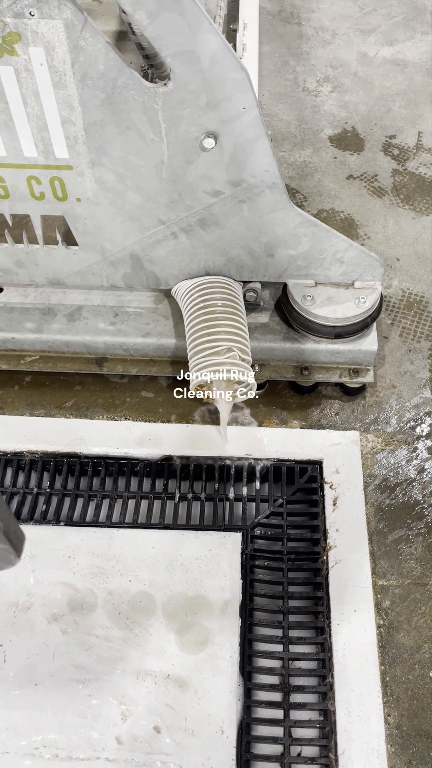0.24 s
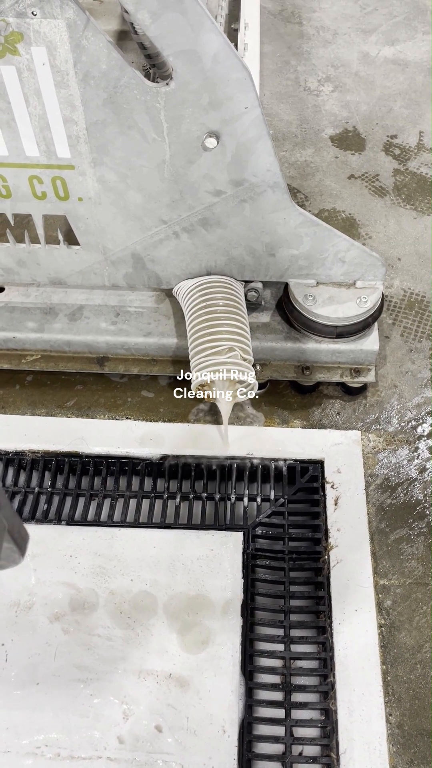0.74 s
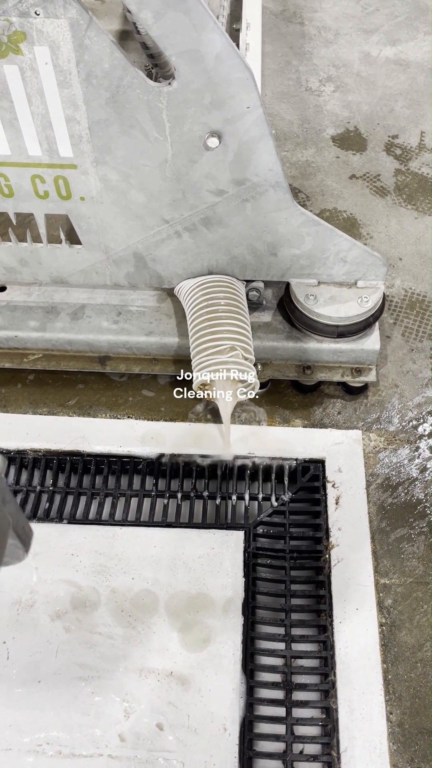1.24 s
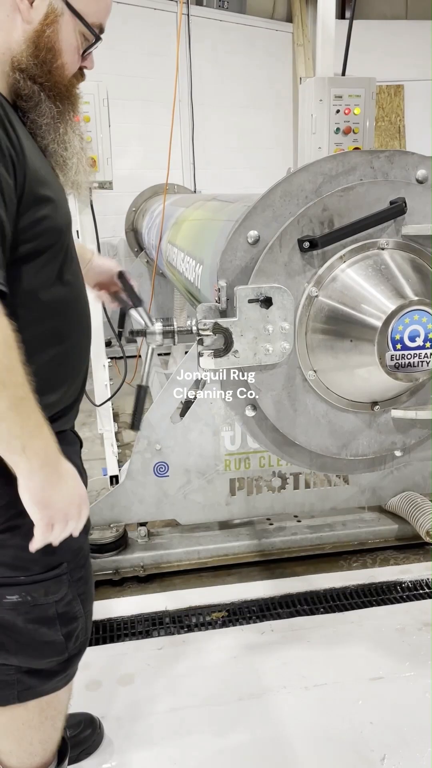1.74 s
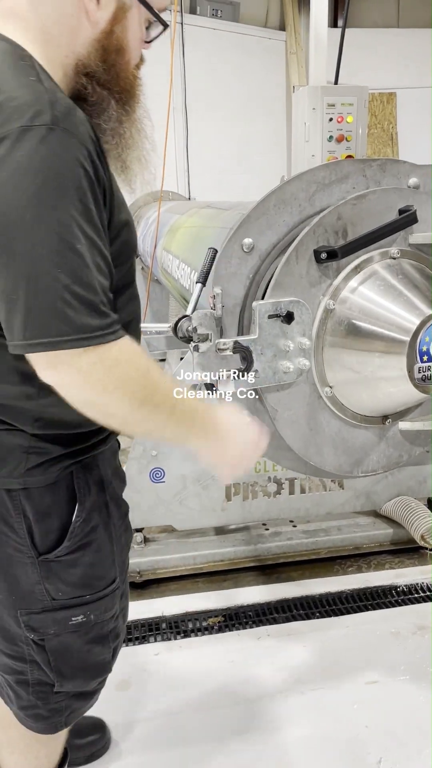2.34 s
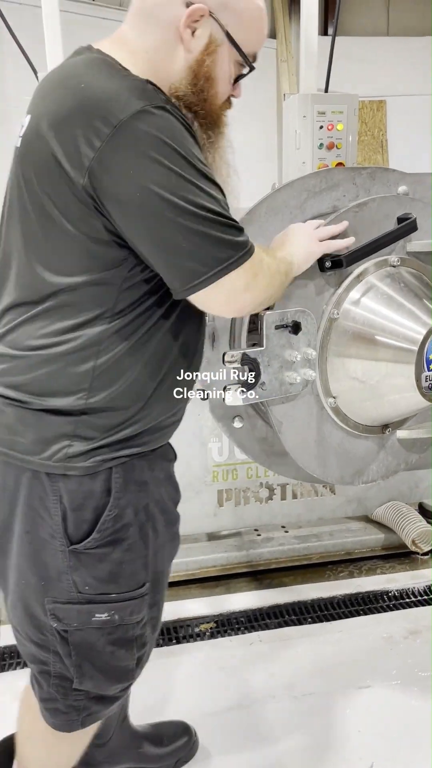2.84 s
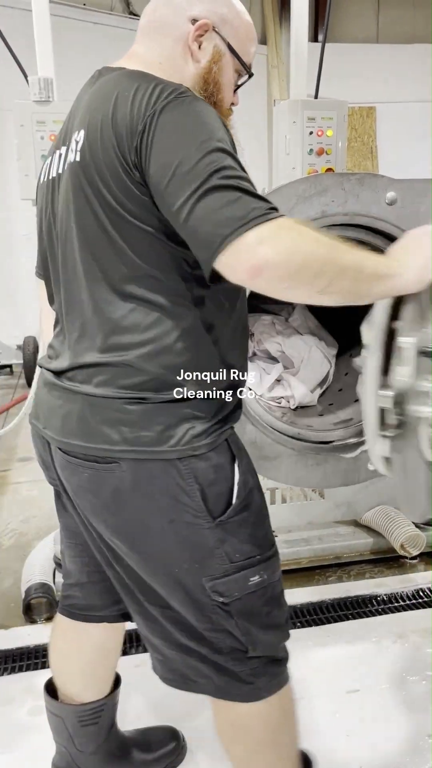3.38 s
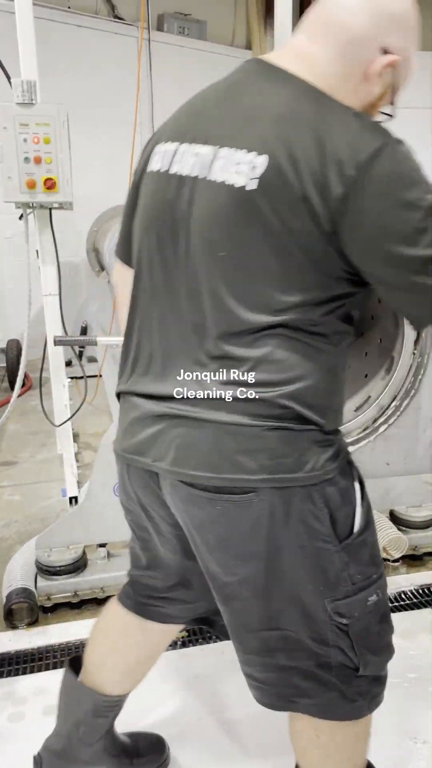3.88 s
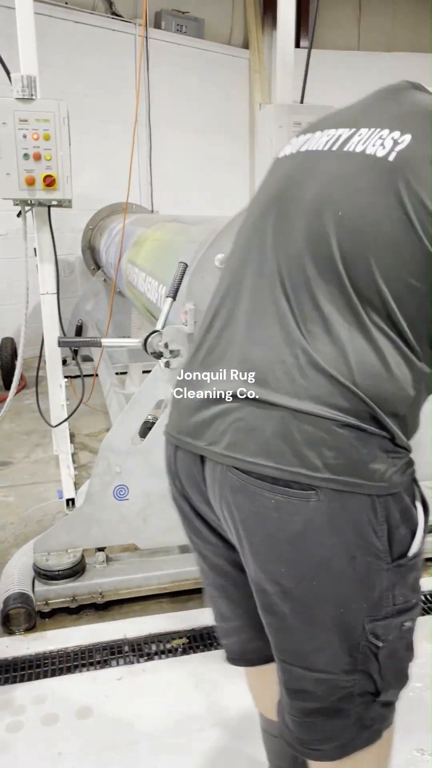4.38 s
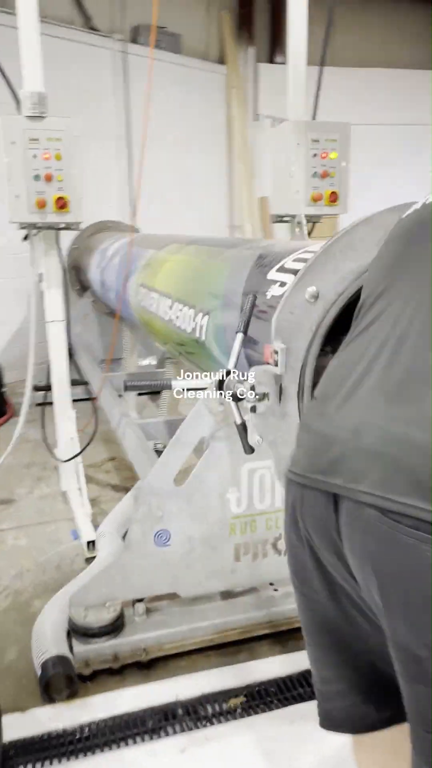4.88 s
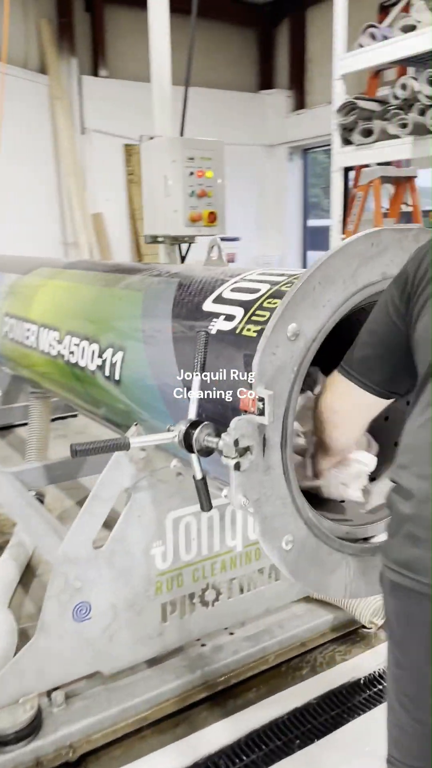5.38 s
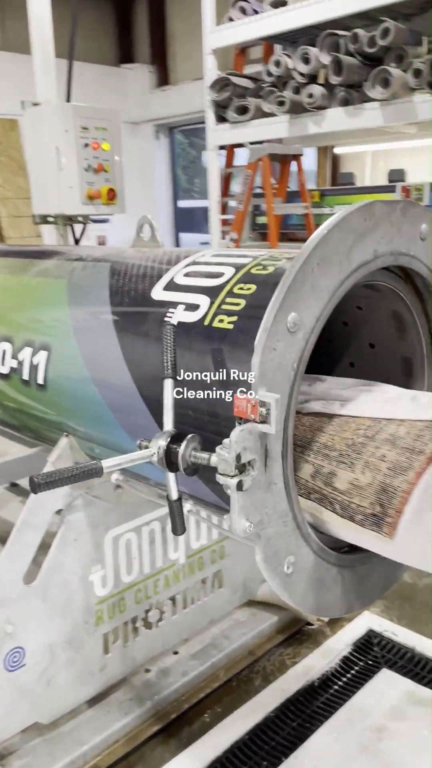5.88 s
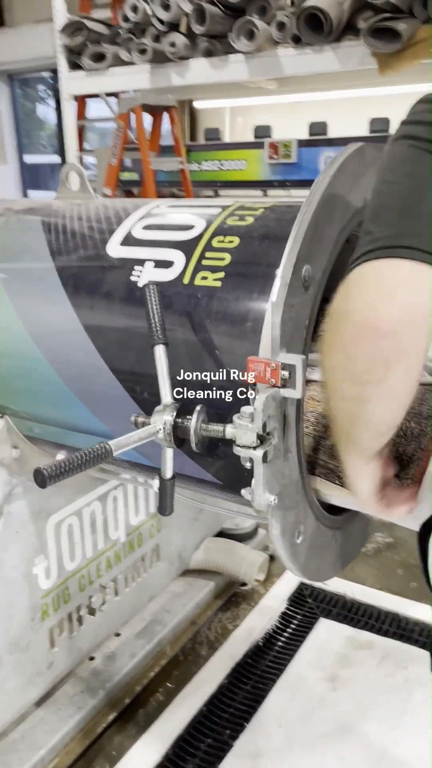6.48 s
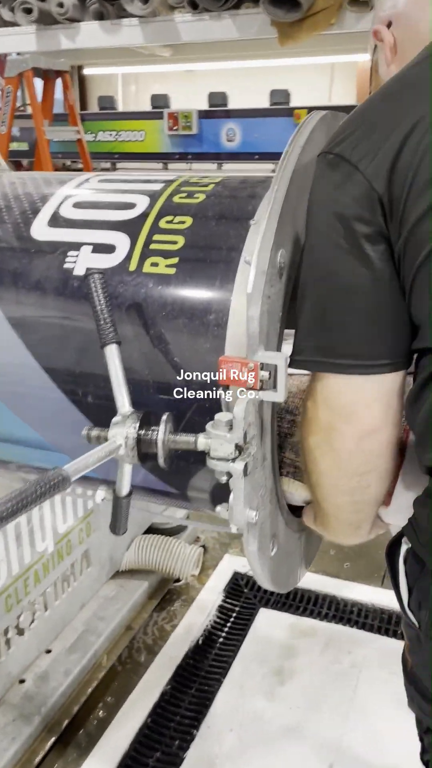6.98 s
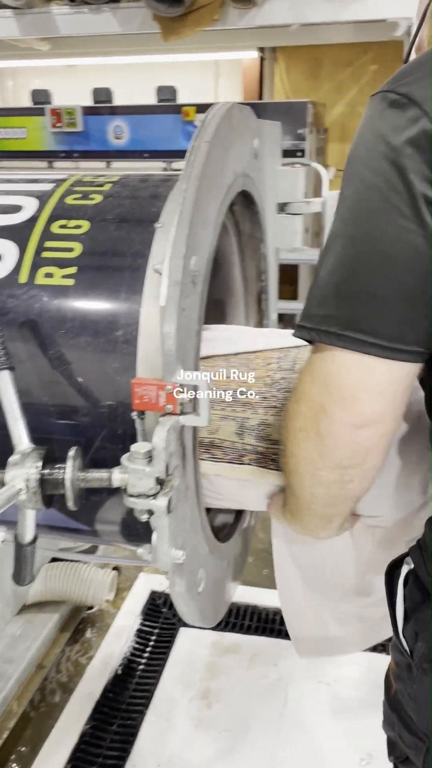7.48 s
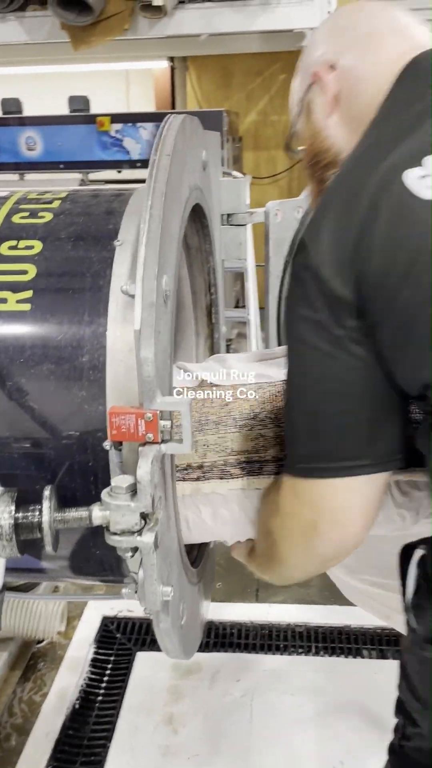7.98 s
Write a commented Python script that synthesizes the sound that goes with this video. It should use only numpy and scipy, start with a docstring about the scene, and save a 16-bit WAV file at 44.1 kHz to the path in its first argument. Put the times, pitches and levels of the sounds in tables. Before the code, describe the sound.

A rug-spinning drum runs at full speed, singing a steady siren-like tone around 410 Hz over rushing air, throbbing panel buzz and thin high whine. It cuts abruptly to a brief silence. Then, in a reverberant workshop with low ventilation hum, steel clamp blows clatter and ring the hollow drum, with dull thuds. Faint clicks follow, then soft cloth rustle and dull scraping over the rim. The stereo microphone later moves closer to the drum mouth.

```python
"""Drum of a rug centrifuge at full speed: siren tone, air rush, draining water, motor lines, inverter whine.
Tones are wavering sines; air and ventilation are coloured noise; water and cloth are filtered grains.
After a short silence, a humming workshop: noise bursts for steel clamp blows, decaying modes for drum and
handles, thuds and clicks of frame and lid, then the wrapped rug rustling and scraping out over the rim."""
import sys
import numpy as np
from scipy import signal
from scipy.fft import rfft, irfft, next_fast_len
from scipy.io import wavfile
from scipy.ndimage import uniform_filter1d

SR = 44100
rng = np.random.default_rng(int(sys.argv[2]) if len(sys.argv) > 2 else 0)


def transcribe(signal):
    """Save signal, clipped to [-1, 1], as a 16-bit WAV file at the path in sys.argv[1]."""
    frames = np.atleast_2d(signal).T
    limited = np.clip(frames, -1, 1)
    pcm = np.round(limited * 32767).astype(np.int16)
    wavfile.write(sys.argv[1], SR, pcm)


N = 362943
TIME = np.arange(N) / SR
SPIN_END_S, SHOP_START_S = 1.3065, 1.4985
BAND_LIMIT_HZ = 15800

# drum tone: (time [s], frequency [Hz])
DRUM_TONE = [(0.02, 409.6), (0.244, 412.3), (1.3, 408.8)]
# brief surges of the rush: (peak time [s], length [s], level re steady rush [dB])
SURGES = [(0.051, 0.21, -11), (0.218, 0.06, -8.5)]
# air dragged round the drum: (frequency [Hz], relative density [dB per Hz])
AIR = [(25, -34.5), (42, -16.5), (55, -3), (150, -1.5), (340, -1.5), (560, -2.5), (900, -2), (1100, -11),
       (2000, -10.5), (2600, -4.5), (3700, -9), (4800, -12.5), (5500, -20.5), (6500, -26.5), (7800, -26),
       (11000, -32.5), (15500, -47)]
# housing resonances excited by the air: (frequency [Hz], width [Hz], boost [dB])
HOUSING = [(740, 52, 3.4), (1364, 240, 8.5), (2035, 380, 3.7), (3400, 240, 5.9)]
# motor and frame lines: (frequency [Hz], level [dB])
MOTOR = [(53, -47), (73, -46.5), (129.2, -41.5), (166.9, -42.5), (247.5, -48.5), (297.5, -44.5),
         (441.8, -38), (489.9, -47), (522, -47), (601, -44.5), (671, -51.5), (840, -55), (936.7, -49),
         (1496, -53)]
# panel resonances under uneven load:
# (first frequency [Hz], last frequency [Hz], first level [dB], last level [dB], throb depth [0-1])
THROBS = [(297.8, 296, -36.5, -52, 0.1), (608, 614, -49.5, -44, 0.9), (742, 778, -40, -36.5, 0.9),
          (1320, 1395, -41.5, -42, 1), (2060, 2050, -51, -53.5, .8), (2470, 2510, -49, -45.5, .9),
          (3320, 3000, -48.5, -53, .8)]
# inverter switching whine and sidebands: (frequency [Hz], level at right port [dB])
INVERTER = [(3738, -65.5), (3838, -60), (3938.7, -49), (4038, -41), (4137.5, -58), (4237.6, -53)]
# thin gliding squeal: (time [s], frequency [Hz], level at right port [dB])
SQUEAL = [(0.02, 4596, -39.5), (0.07, 4600, -52), (0.12, 4606, -41), (0.19, 4609, -40), (0.25, 4610, -51.5),
          (0.39, 4617, -56), (0.5, 4610, -48), (0.65, 4640, -63), (0.79, 4629, -47), (1.13, 4620, -50.5),
          (1.22, 4570, -60)]
# two-port image of the running machine:
# (frequency [Hz], likeness [0-1], phase lead of left [rad], left over right [dB])
SPIN_PORTS = [(150, 1, 0, 0.2), (417, 0.98, 0.36, 1.5), (505, 0.9, 1, 3.5), (634, 0.8, 0.5, 6),
              (1100, 0.88, 0.8, 7.5), (1450, 0.88, 1.1, 6), (2190, 0.86, 0.3, -1.5), (2380, .35, 4, 1),
              (2880, 0.68, 3, 0), (3580, 0.3, 3, 0.5), (4700, 0.35, 2.8, -1), (5300, .65, .4, -1),
              (6200, .8, 1.6, 0), (7700, 1, 3.14, 0), (10000, .9, 4.8, 0), (11100, 1, 6.28, 0),
              (12500, .4, 7.5, 0)]
# two-port image of the workshop: same columns
SHOP_PORTS = [(250, 1, 0, 0), (430, .92, 0, 0), (730, .65, 0, .8), (1450, .7, .2, 1.8), (2000, .77, .3, .4),
              (3200, .47, 1.6, .8), (4400, .38, 1.1, .5), (4850, .35, -.2, .3), (5400, .7, .5, 0),
              (6000, .75, 1.45, 0), (7700, 1, 3.14, 0), (9500, .85, 4.55, 0), (11100, 1, 6.28, 0),
              (12500, .4, 7.5, 0)]
# two-port image of the clamp: same columns
CLAMP_PORTS = [(400, 1, 0, 0), (750, .9, 0, 2), (1900, .85, .1, 0), (3200, .6, .9, 0), (4500, .62, .8, 0),
               (4900, .72, -.2, .5), (6000, .75, 1.45, 0), (7700, 1, 3.14, 0), (11100, 1, 6.28, 0)]
# workshop ventilation: (frequency [Hz], relative density [dB per Hz])
VENT = [(25, -40), (40, -4.5), (55, -4), (72, 2.5), (100, -4.5), (210, -4), (330, -14), (700, -19.5),
        (2100, -23), (3200, -24), (5300, -29.5), (6500, -31), (8000, -37), (11000, -42.5), (15500, -53)]
# hum of mains and a fan: (frequency [Hz], level [dB])
HUM = [(59.2, -42), (118.4, -49.5), (232.3, -56)]
# idle drive tones: (frequency [Hz], level from afar [dB], level at the drum mouth [dB])
IDLE = [(432.5, -65, -61), (1152, -66, -65), (1562, -66.5, -67.5), (1927, -70, -71), (2216, -65, -74),
        (2344, -69.5, -67)]
# steel clamp blows: (time [s], relative level [dB], rattle decay [s], favoured contact frequency [Hz],
# energy fed to drum re blow [dB])
CLANKS = [(1.488, -16.5, 0.023, 1260, -17), (1.507, -23.5, 0.01, 1700, -17), (1.531, -25, 0.015, 1490, -20),
          (1.549, -12.5, 0.0069, 225, -27), (1.569, -18, 0.0063, 1600, -30), (1.598, -29, .012, 1800, -19),
          (1.645, -31.5, 0.021, 338, -31), (1.692, -30, 0.016, 1900, -18), (1.712, -30, 0.015, 1490, -9),
          (1.742, -21.5, 0.0066, 240, -22), (1.765, -23, 0.0083, 234, -23), (1.978, -27, 0.035, 1500, -19),
          (1.984, -22.5, 0.021, 500, -14), (2.020, -22.5, 0.036, 318, -32), (2.070, -12.5, 0.031, 784, -11),
          (2.085, -31, 0.02, 2710, -16), (2.102, -14, 0.024, 560, -4), (2.117, -10, 0.0073, 804, -4.5),
          (2.160, -20, 0.013, 380, -11), (2.210, -22, 0.01, 696, 2), (2.275, -20.5, 0.019, 380, -15)]
# colour of a blow on the frame: (frequency [Hz], relative density [dB per Hz])
FRAME = [(40, -26), (120, 0), (190, -4.5), (240, 1), (340, 7.5), (420, -1), (520, 2.5), (850, -2),
         (1100, -5.5), (1400, -7), (1800, -10), (2700, -9.5), (3300, -14.5), (4300, -18.5), (5500, -20.5),
         (6700, -16.5), (7700, -38), (9000, -23), (15000, -54)]
# damped resonances of clamp screw and handles: (frequency [Hz], width [Hz], boost [dB])
STEEL = [(1055, 50, 4.5), (1296, 63, 2), (1770, 110, 0), (2600, 140, -1), (3450, 130, 6.5), (4100, 200, 7)]
# drum and lid modes: (frequency [Hz], relative level [dB], t60 [s])
DRUM = [(243, -12.5, 2.34), (276, -11.5, 1.4), (292, -12.5, 2.47), (342, 3, 0.72), (372, -6, 0.75),
        (503, -4, 0.94), (578, -12.5, 1.2), (632, 0, 0.83), (642, -12, 1.5), (666, -19, 0.54),
        (723, -13, 0.5), (775, -12, 0.63), (840, -15.5, 0.95), (915, -12, 0.61), (1184, -23, 1.1),
        (1278, -21.5, 1.33), (1700, -28, .45), (2560, -19, .4), (2670, -22, 0.5), (3500, -25, 0.65),
        (3960, -28, 0.45)]
# knocks and clicks of clamp, lid and latch:
# (time [s], relative level [dB], decay [s], centre [Hz], width of first filter [octaves])
TICKS = [(1.507, -24.5, 0.0022, 3300, 0.34), (1.571, -25.5, 0.0099, 2580, 0.71),
         (1.575, -30.5, 0.0043, 4840, 0.34), (1.586, -36, .004, 6000, .3), (2.633, -45, .006, 4330, 0.74),
         (3.532, -45.5, .012, 4000, 1.3), (3.544, -47, 0.014, 2800, 2), (3.547, -40, 0.01, 1000, 3.0),
         (3.556, -41.5, 0.0098, 700, 2.6), (3.598, -47, 0.0071, 900, 1.2), (3.689, -37, 0.007, 3500, 2.2),
         (3.699, -43, .006, 5000, 2), (4.002, -48, .008, 4000, 1.8), (4.291, -43.5, 0.0081, 4400, 1.4),
         (7.434, -48, .003, 8000, 0.74), (7.742, -51, .01, 4500, 1), (7.795, -50, .014, 5200, .8),
         (7.838, -51, .016, 5000, .7), (8.142, -44, 0.0054, 2700, .6)]
# dull thuds of frame and floor: (time [s], relative level [dB], frequency [Hz], decay [s])
THUDS = [(1.551, -24, 220, .04), (1.735, -23, 75.7, 0.02), (1.772, -28.5, 139.6, .04),
         (1.766, -7.5, 91, 0.0064), (1.775, -27, 49, 0.074), (1.836, -19.5, 96, 0.022),
         (1.881, -17.5, 74, 0.016), (2.101, -32.5, 123, 0.22), (2.198, -34, 70, 0.16),
         (4.307, -33, 71, .05), (4.615, -37, 201, 0.055), (5.12, -37, 183, 0.061),
         (7.071, -32, 68.5, 0.056), (7.221, -34, 62, .05), (7.655, -38.5, 127, .04), (8.16, -28, 55.5, .06)]
# handles striking their stops: (time [s], relative level [dB])
CHINKS = [(2.087, -32), (2.118, -36), (2.185, -37), (2.223, -40)]
# handle modes: (frequency [Hz], relative level [dB], t60 [s])
HANDLE = [(2585, -2, .12), (2652, -1.5, 0.11), (2740, -4, .1), (3440, -12, .08), (3970, -14, .08)]
# workshop reverberation: (frequency [Hz], t60 [s])
ROOM = [(100, 1), (350, 1), (700, 0.66), (1500, 0.69), (3000, 0.77), (6000, 0.83), (14000, 0.31)]
# handling and pulls of the wrapped rug:
# (peak time [s], length [s], cloth rustle level [dB], rim scrape level [dB])
PULLS = [(2.95, 0.73, -57, -70), (3.898, 0.83, -56.5, -76), (4.34, 0.21, -56, -54), (4.804, 0.44, -55, -57),
         (5.45, 0.67, -53, -61), (5.76, 0.5, -51, -66), (6.45, 0.89, -85, -58.5), (7.2, 0.69, -80, -58),
         (7.55, 0.28, -59, -62), (7.822, 0.35, -50.5, -51), (8.038, 0.22, -70, -54)]
# rustle of the cloth wrap: (frequency [Hz], relative density [dB per Hz])
RUSTLE = [(100, 12), (350, -9), (900, 5.5), (2500, -5.5), (5500, -3), (8000, -5), (11000, -12.5),
          (15500, -33)]
# rug rubbing along the inside of the drum: (peak time [s], length [s], level [dB])
RUBS = [(4.6, .2, -59), (4.87, .25, -57), (5.22, .3, -58), (5.58, .25, -60), (7.5, .25, -57)]

# tone and rush sink as water leaves the rug; surges lift the tone by a share of their height
TONE_START_DB, TONE_DB_PER_S, TONE_SURGE_SHARE = -14, -1.83, 0.28
AIR_START_DB, AIR_DB_PER_S, WATER_RE_AIR_DB = -28, -1.5, -26
THROB_PER_S, PANEL_SETTLE_S = 7.1, 0.99
COMPANION_ABOVE_HZ, COMPANION_DB = 303, -55.5
# second fan, beating against the hum; weaker at the drum mouth
FAN_HZ, FAN_FAR_DB, FAN_NEAR_DB = 52.3, -46, -51
# microphone move to the drum mouth
MOVE_MID_S, MOVE_LENGTH_S = 5, 0.57
# harder contacts have a higher pitch and stay bright further up: corner at a 1 kHz contact, growth exponent
DULL_HZ_AT_1_KHZ, DULL_POWER = 1880, 1.57
GRIT_DB = 2  # unevenness of the tiny contacts in a rattle
PULL_RISE = 0.59  # rise side of a pull: builds slowly, lets go faster


def amp(db):
    """Decibels to gain."""
    return 10 ** (np.asarray(db) / 20)


def unit(x):
    """Scales to rms 1."""
    return x / np.sqrt(np.mean(x ** 2) + 1e-20)


def read(points, hz):
    """Reads a table on a log-frequency axis."""
    f, value = np.transpose(points)
    return np.interp(np.log(hz + 1), np.log(f + 1), value)


def curve(rows):
    """Each column of a control table at every sample."""
    s, *columns = np.transpose(rows)
    return [np.interp(TIME, s, c) for c in columns]


def add(mix, s, sound):
    """Places a sound at time s."""
    part = mix[max(round(s * SR), 0):][:len(sound)]
    part += sound[:len(part)]


def drift(hz):
    """Slow chance of rms 1, up to about hz."""
    count = 2048
    f = np.fft.rfftfreq(count, TIME[-1] / count)
    slow = irfft(rfft(rng.standard_normal(count)) / (1 + (f / hz) ** 4))
    return np.interp(TIME, np.linspace(0, TIME[-1], count), unit(slow))


def swell(peak_s, length_s, rise=0.41):
    """A smooth hump of height 1; rise and 1 - rise share length_s between its two sides."""
    rise = np.clip(rise, .1, .9)
    side_s = length_s * np.where(TIME < peak_s, rise, 1 - rise)
    return np.exp(-((TIME - peak_s) / side_s) ** 2)


def peaks_db(rows, hz):
    """Boost in dB of a set of resonances."""
    return sum(db / (1 + (2 * (hz - centre) / width) ** 2) for centre, width, db in rows)


def ports(pair, field):
    """Two unrelated versions of a sound become left and right: partly alike, shifted in phase and level."""
    size = next_fast_len(N, True)
    hz = np.fft.rfftfreq(size, 1 / SR)
    a, b = rfft(pair, size)
    f, *columns = np.transpose(field)
    same, turn, tilt_db = (np.interp(hz, f, c) for c in columns)
    same, left = np.clip(same, 0, 1), amp(tilt_db / 2)
    right = (same * a + np.sqrt(1 - same ** 2) * b) * np.exp(-1j * turn) / left
    balance = np.sqrt((left ** 2 + left ** -2) / 2)  # keeps mean power of the ports
    return irfft(np.array([a * left, right]) / balance, size)[:, :N]


def noise(colour_db, field, ripple_db=2, ripple_hz=14):
    """Coloured noise of rms 1 at the two ports; standing waves ripple its spectrum."""
    size = next_fast_len(N, True)
    hz = np.fft.rfftfreq(size, 1 / SR)
    ripple = np.interp(hz, np.arange(4096) * ripple_hz, rng.standard_normal(4096))
    colour = amp(colour_db(hz) + ripple_db * ripple * hz / (hz + 300))
    white = rng.standard_normal((2, size))
    return unit(ports(irfft(rfft(white) * colour, size), field))


def lines(rows, waver, waver_hz):
    """Steady tones that waver in phase and strength."""
    out = np.zeros(N)
    for hz, db in rows:
        angle = 2 * np.pi * (hz * TIME + rng.random()) + waver * drift(waver_hz)
        strength = 1 + waver * drift(waver_hz) / 2
        out += amp(db) * np.sqrt(2) * strength * np.sin(angle)
    return out


def grains(per_s, spread_db):
    """Sparse clicks of very uneven size at each port."""
    size = amp(spread_db * np.minimum(rng.exponential(1, (2, N)), 4))
    hits = rng.random((2, N)) < per_s / SR
    return unit(size * rng.standard_normal((2, N)) * hits)


def band(x, hz, octaves):
    """A broad resonance around hz."""
    edges = np.clip([hz / 2 ** (octaves / 2), hz * 2 ** (octaves / 2)], 1, SR / 2 - 1)
    return signal.sosfilt(signal.butter(1, edges, "band", fs=SR, output="sos"), x)


def drum_tone(surge):
    """The perforated drum sings like a siren; right lags left in phase."""
    level_db = TONE_START_DB + TONE_DB_PER_S * TIME
    level_db = level_db + 20 * np.log10(1 + abs(TONE_SURGE_SHARE) * surge)
    angle = 2 * np.pi * np.cumsum(curve(DRUM_TONE)[0]) / SR + 0.1 * drift(hz=30)
    return np.sqrt(2) * amp(level_db + 0.5 * drift(hz=29.4)) * np.sin([angle, angle - .3])


def air_rush(air_db):
    """Air dragged round the drum excites the housing resonances."""
    colour = lambda f: read(AIR, f) + peaks_db(HOUSING, f)
    rush = noise(colour, SPIN_PORTS, ripple_db=3.0, ripple_hz=18)
    return rush * amp(air_db + 0.7 * drift(hz=39.9))


def draining_water(air_db):
    """Water spatters into the drain as sparse grains in a broad resonance."""
    drops = grains(per_s=320, spread_db=2.0)
    for _ in range(2):
        drops = band(drops, hz=2530, octaves=0.74)
    return unit(drops) * amp(air_db + WATER_RE_AIR_DB)


def throbbing():
    """Panels buzz in uneven bursts, about one for each turn of the uneven load, and creep in pitch."""
    turn = 2 * np.pi * THROB_PER_S * TIME + 1.0 * drift(hz=5)
    emptied, out = np.clip(TIME / PANEL_SETTLE_S, 0, 1), np.zeros(N)
    for first_hz, last_hz, first_db, last_db, depth in THROBS:
        bursts = unit(1 + np.clip(depth, 0, 1) * np.sin(turn + 2 * np.pi * rng.random()))
        hz = first_hz + (last_hz - first_hz) * emptied
        level_db = first_db + (last_db - first_db) * emptied + 2.6 * drift(hz=8.7)
        angle = 2 * np.pi * np.cumsum(hz) / SR + 0.87 * drift(hz=26)
        out += np.sqrt(2) * bursts * amp(level_db) * np.sin(angle)
    return out


def motor():
    """Motor and frame lines with throbbing panels, unrelated versions spread over the ports."""
    return ports([lines(MOTOR, waver=0.68, waver_hz=11.0) + throbbing() for _ in range(2)], SPIN_PORTS)


def squeal():
    """Two thin, unsteady tones that glide together; the lower one flares and fades."""
    hz, db = curve(SQUEAL)
    low_angle = 2 * np.pi * np.cumsum(hz) / SR + 0.25 * drift(hz=15)
    low = amp(db + 1.0 * drift(hz=24)) * np.sin(low_angle)
    high_angle = 2 * np.pi * np.cumsum(hz + COMPANION_ABOVE_HZ) / SR + 0.7 * drift(hz=16)
    high = amp(COMPANION_DB + 3.1 * drift(hz=13)) * np.sin(high_angle)
    return np.sqrt(2) * (low + high)


def inverter_whine():
    """Switching tones and squeal, louder at the left port and there first."""
    whine = lines(INVERTER, waver=0.32, waver_hz=22) + squeal()
    return np.array([whine * amp(2.5), np.roll(whine, 2)])


def spinning():
    """The running centrifuge: shared surges lift tone, air and water."""
    surge = sum(amp(db) * swell(s, length) for s, length, db in SURGES)
    air_db = AIR_START_DB + AIR_DB_PER_S * TIME + 20 * np.log10(1 + surge)
    return drum_tone(surge) + air_rush(air_db) + draining_water(air_db) + motor() + inverter_whine()


def clamp():
    """Each blow is a short, uneven rattle of steel on steel."""
    blows, t = np.zeros(N), np.arange(SR // 4) / SR
    hz = np.fft.rfftfreq(len(t), 1 / SR)
    for s, db, rattle_s, contact_hz, _ in CLANKS:
        dull_hz = DULL_HZ_AT_1_KHZ * (contact_hz / 10 ** 3) ** DULL_POWER
        contact_db = 7 / (1 + (7 * (hz / contact_hz - 1)) ** 2)
        colour = amp(read(FRAME, hz) + peaks_db(STEEL, hz) + contact_db)
        colour = colour / np.sqrt(1 + (hz / dull_hz) ** 2)
        chatter = irfft(np.exp(2j * np.pi * rng.random(len(hz))) * colour, len(t))
        smooth = uniform_filter1d(rng.standard_normal(len(t)), size=110)
        grit = amp(GRIT_DB * unit(uniform_filter1d(smooth, size=90)))
        envelope = np.exp(-t / rattle_s) * (1 - np.exp(-t / 0.0015))
        add(blows, s, amp(db) * unit(chatter * grit) * envelope)
    return blows


def drum_ring():
    """Every blow feeds energy into the modes of the drum, which lose it at their own pace."""
    fed, out = np.zeros(N), np.zeros(N)
    for s, db, *_, ring_db in CLANKS:
        add(fed, s, amp(db + ring_db) ** 2 * np.full(1024, 1 / 1024))
    for hz, db, t60_s in DRUM:
        energy = signal.lfilter([1], [1, -np.exp(-np.log(1e6) / (t60_s * SR))], fed)
        angle = 2 * np.pi * (hz * TIME + rng.random()) + 0.44 * drift(hz=8.6)
        out += amp(db + 1.75 * drift(hz=9.2)) * np.sqrt(energy) * np.sin(angle)
    return out


def room(x):
    """Dense reflections, each band dying at its own speed."""
    hz, t, z = signal.stft(rng.standard_normal(SR), SR, nperseg=256)
    decay = amp(-60 * t / read(ROOM, hz)[:, None])
    tail = signal.istft(z * decay, SR, nperseg=256)[1]
    tail *= 1 - np.exp(-np.arange(len(tail)) / SR / 0.001)
    return signal.fftconvolve(x, tail / np.linalg.norm(tail))[:N]


def workshop():
    """Ventilation roar with mains hum, two fans beating and thin idle-drive tones."""
    vent = noise(lambda f: read(VENT, f), SHOP_PORTS) * amp(-41.5 + 0.67 * drift(hz=6.5))
    near = np.clip((TIME - MOVE_MID_S) / MOVE_LENGTH_S + .5, 0, 1)
    vent -= 0.15 * near * band(vent, hz=170, octaves=1.7)  # a little thinner around 170 Hz after the move
    fan_db = FAN_FAR_DB + (FAN_NEAR_DB - FAN_FAR_DB) * near
    fan = np.sqrt(2) * amp(fan_db) * np.sin(2 * np.pi * (FAN_HZ * TIME + rng.random()))
    idle = [(hz, far_db + (near_db - far_db) * near) for hz, far_db, near_db in IDLE]
    # deep waver: the thin tones swell and fade
    whine = ports([lines(idle, waver=0.99, waver_hz=3.04) for _ in range(2)], SHOP_PORTS)
    return vent + fan + whine + lines(HUM, waver=0.25, waver_hz=2.4)


def ticks():
    """Light contacts that do not ring."""
    out, t = np.zeros(N), np.arange(SR // 8) / SR
    for s, db, decay_s, hz, octaves in TICKS:
        contact = band(band(rng.standard_normal(len(t)), hz, octaves), hz, 0.78 * octaves)
        add(out, s, amp(db) * unit(contact) * np.exp(-t / decay_s))
    return out


def thuds():
    """Low, quickly damped swings of the heavy frame."""
    out, t = np.zeros(N), np.arange(SR // 3) / SR
    for s, db, hz, decay_s in THUDS:
        envelope = np.exp(-t / decay_s) * (1 - np.exp(-t / 0.0061))
        add(out, s, amp(db) * np.sin(2 * np.pi * hz * t) * envelope)
    return out


def chinks():
    """The loose steel handles ring briefly."""
    out, t = np.zeros(N), np.arange(SR // 4) / SR
    for s, db in CHINKS:
        ring = np.zeros(len(t))
        for hz, mode_db, t60_s in HANDLE:
            ring += amp(db + mode_db - 60 * t / t60_s) * np.sin(2 * np.pi * (hz * t + rng.random()))
        add(out, s, ring * (1 - np.exp(-t / 0.0008)))
    return out


def rug():
    """Cloth catches and slips over the rim of the drum: a fine rustle above a dull scrape."""
    power = sum(np.outer(amp(levels_db), swell(s, length, PULL_RISE)) ** 2
                for s, length, *levels_db in PULLS)
    cloth, weight = np.sqrt(power)
    rustle = noise(lambda f: read(RUSTLE, f), SHOP_PORTS) * amp(1.7 * drift(hz=45))
    slips = band(grains(per_s=820, spread_db=-1.5), hz=440, octaves=0.57)
    scrape = unit(ports(slips, SHOP_PORTS))
    return rustle * cloth + scrape * weight


def rubbing():
    """Cloth slips in coarse clumps over the perforated wall, hollow inside the drum."""
    level = sum(amp(db) * swell(s, length, PULL_RISE) for s, length, db in RUBS)
    slips = grains(per_s=900, spread_db=1.5)
    for _ in range(2):
        slips = band(slips, hz=1650, octaves=1.3)
    return unit(ports(slips, SHOP_PORTS)) * level * amp(2.5 * drift(hz=25))


def scene():
    """The spin, a short silence, then the unloading."""
    blows, ring = clamp(), drum_ring()
    clicks, low = ticks() + chinks(), thuds()
    near = amp(-5.0) * blows + amp(-9.5) * ring + clicks + low
    sent = amp(-3.5) * blows + amp(-11.5) * clicks + amp(-5.5) * low  # into the room
    contacts = ports([near + room(sent), amp(1.5) * room(sent)], CLAMP_PORTS)
    unloading = contacts + workshop() + rug() + rubbing()
    fade = lambda on: uniform_filter1d(on.astype(float), size=64)
    return spinning() * fade(TIME < SPIN_END_S) + unloading * fade(TIME > SHOP_START_S)


def record(dry):
    """Linear-phase low-pass at the band limit."""
    lowpass = signal.firwin(511, BAND_LIMIT_HZ, window=("kaiser", 9), fs=SR)
    return signal.oaconvolve(dry, lowpass[None], "same")


dry = scene()
out = record(dry)
transcribe(out)
```